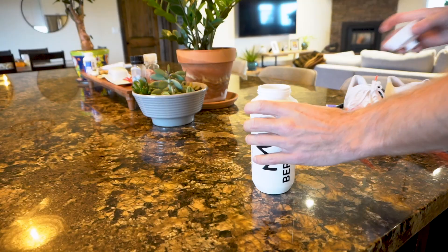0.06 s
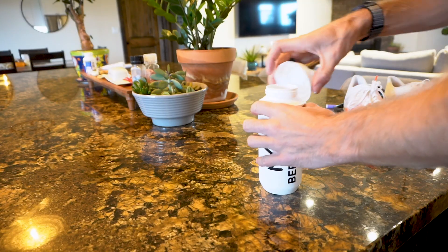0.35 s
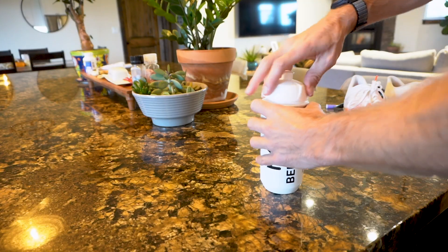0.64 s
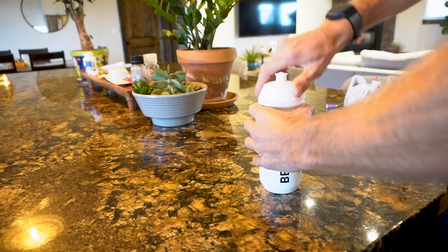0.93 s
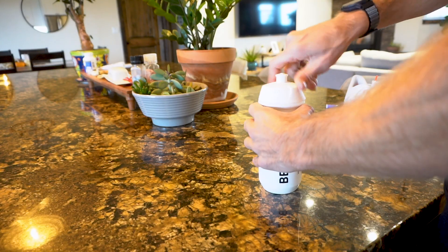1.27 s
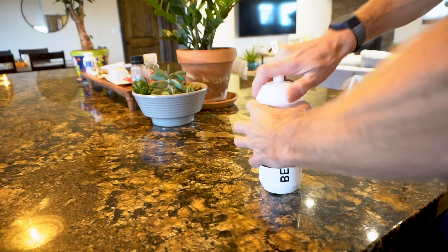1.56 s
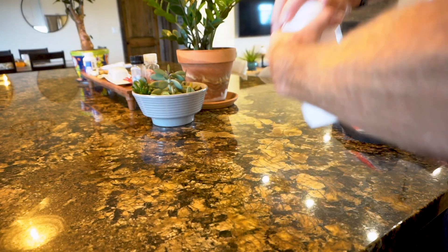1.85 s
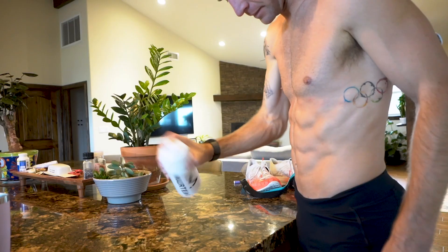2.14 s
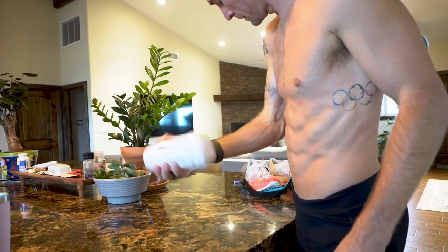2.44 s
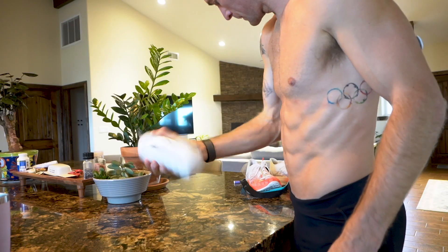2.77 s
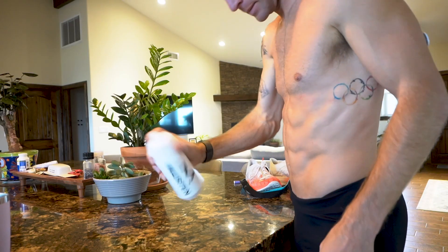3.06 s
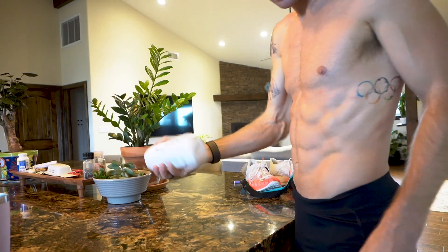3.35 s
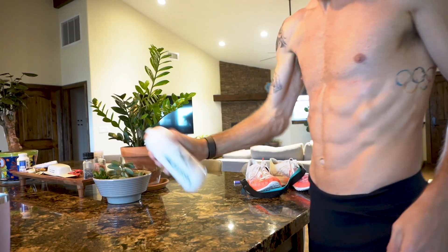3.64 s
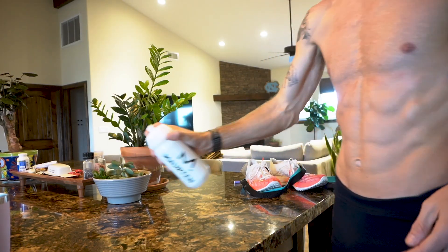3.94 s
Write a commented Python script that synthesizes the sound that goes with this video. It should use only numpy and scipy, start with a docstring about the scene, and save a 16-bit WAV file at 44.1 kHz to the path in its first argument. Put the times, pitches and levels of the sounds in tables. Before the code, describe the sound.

Plastic bottle screwed shut with snaps and squeaks, then liquid sloshes inside during hard shaking.

```python
"""A quiet kitchen, close on a plastic sports bottle on the stone counter. The lid is set on, rasps and
squeals round its thread and snaps tight; the air under it rings lower as the gap closes, and the
bottle shudders under the hand. Then comes a hard shake: the drink slams from end to end in bursts of
bubbles, thuds and spray, with wet slaps, hollow plops and a few sharp rattles on top."""
import sys
import numpy as np
from scipy import signal
from scipy.fft import rfft, irfft
from scipy.io import wavfile
from scipy.ndimage import uniform_filter1d

SR = 44100
rng = np.random.default_rng(int(sys.argv[2]) if len(sys.argv) > 2 else 0)


def wrap_up_sound(samples):
    """Save the sound to the file named by the first command line argument, as 16-bit audio."""
    columns = np.atleast_2d(samples).T
    # keep every value between -1 and 1, then stretch to whole-number steps
    tamed = np.clip(columns, -1, 1)
    steps = np.round(tamed * 32767).astype(np.int16)
    wavfile.write(sys.argv[1], SR, steps)


N = 176400
T = np.arange(N) / SR

# Tone curves, each f/Hz, relative level/dB:
AIR_EQ = [(15, -76), (25, 12.5), (53, -11.5), (82, -10.5), (123, -13), (145, -10), (161, -9.5), (217, -18),
          (624, -25), (863, -27), (936, -27), (1840, -28), (16000, -47.5)]  # still room air
RASP_EQ = [(500, -8), (2000, -6), (4500, 4), (6500, -1), (9000, -3.5), (12000, -3.5), (14000, -7),
           (16000, -7)]  # dry friction hiss
BODY_EQ = [(50, -9), (150, -4), (270, 5), (420, -6), (650, -3.5), (1100, -7.5), (2000, -9.5), (4000, -11.5),
           (9000, -44)]  # body of the rubbed bottle
TICK_EQ = [(100, 1), (600, 8.5), (2000, 2.5), (4500, -3.5), (8000, -10.5), (11000, -15), (16000, -24)]  # attack of a click or plop
SPLASH_EQ = [(200, -5), (500, -15.5), (800, -6), (1100, -2.5), (1400, -2), (1750, 2), (2050, -1.5),
             (2350, -3), (2800, -3), (3350, 0.5), (3750, -3.5), (4300, -11), (5500, -28), (9000, -15),
             (16000, -54)]  # bubbles through the wall
SPRAY_EQ = [(1000, -9), (3000, -0.5), (4600, 3), (6500, 0), (8500, -5.5), (10500, -8.5), (13000, -12),
            (16000, -17)]  # fine foam
THUD_EQ = [(40, -17), (110, -28.5), (170, -1.5), (280, -1.5), (420, -3.5), (600, -6), (1000, -18),
           (2500, -18.5), (8000, -76)]  # weight of the drink
SLAP_EQ = [(100, -20), (300, 18), (1500, -4), (3500, 0.5), (5000, 1), (8000, -6), (12000, -13.5),
           (16000, -19)]  # a drop on plastic

# Room hum: f/Hz, level/dB
HUM_TONES = [(156, -63.5)]
# Strokes of plastic and fingers: t/s, length/s, squeak/dB, level ramp/dB, squeak/Hz, hiss/dB, body/dB
RUB_STROKES = [(0, 0.072, -39.5, -8, 1720, -53.5, -39.5), (0.15, 0.15, -68, 2, 2020, -69.5, -65.5),
               (0.427, 0.13, -46, -3, 2010, -54, -44), (0.5, 0.034, -38, -14, 3420, -42, -38.5),
               (0.543, 0.1, -60, 10, 3120, -60, -50.5), (0.654, 0.062, -50, 4, 3600, -54.5, -45),
               (0.746, 0.051, -66, -3, 3500, -58, -43), (0.79, 0.03, -35.5, -3, 3450, -52, -46),
               (0.829, 0.076, -67, -9.5, 3440, -66, -42.5), (0.895, 0.073, -37.5, 1, 3580, -43, -48.5),
               (0.968, 0.059, -43.5, 5, 3640, -49, -51.5), (1.028, 0.089, -42, 3, 3660, -45, -51.5),
               (1.263, .012, -48, 3, 3500, -48, -32.5), (1.266, 0.095, -40, -5, 3600, -45, -43),
               (1.358, 0.11, -40.5, -7, 3470, -66, -46.5), (1.474, 0.035, -43.5, -3, 3440, -46, -43),
               (1.51, 0.036, -43, -3, 3380, -59, -49), (1.549, 0.059, -36.5, -4, 3280, -43, -48),
               (1.607, 0.12, -50, -4, 3400, -57.5, -47.5), (1.738, 0.028, -42, -2.5, 3330, -48.5, -51),
               (1.774, 0.02, -44, -2, 3260, -42.5, -49), (1.796, 0.14, -57.5, 1, 3440, -59, -59.5),
               (1.989, 0.046, -44.5, 0, 3260, -54, -78)]
# Plastic clicks: t/s, ring/dB, ring/Hz, ring width/Hz, knock/dB, knock/Hz, tick/dB
LID_CLICKS = [(.0085, -4, 1610, 590, -35, 600, -20), (.386, -26, 2200, 900, -34, 800, -63),
              (0.4088, 6.5, 1460, 540, -20, 520, -13.5), (0.4902, -12, 3160, 700, -15, 1320, -33),
              (0.4953, -12, 3260, 500, -17, 1190, -16.5), (.503, -30, 3400, 600, -17.5, 1020, -34),
              (0.5763, -17, 3040, 900, -14, 600, -26.5), (0.5815, -16, 3100, 450, -20, 700, -30),
              (.637, -18, 3380, 497, -17, 570, -26.5), (0.7236, -13, 3270, 450, -24, 600, -36),
              (0.7269, 3.5, 3080, 593, -1, 600, -15), (0.737, -10.5, 3560, 400, -12, 540, -33),
              (0.821, -36.5, 3400, 600, -19, 590, -36), (0.975, -34, 3600, 600, -24, 405, -36),
              (1.017, -35, 3570, 600, -18.5, 400, -41), (1.076, -35, 3600, 600, -21, 326, -38),
              (1.118, -33, 3650, 600, -21.5, 370, -36), (1.265, -9, 3360, 420, -9, 335, -29.5),
              (1.2672, 10, 3500, 423, -10, 480, -19.5), (1.499, -15, 3200, 350, -17.5, 300, -38),
              (1.5755, -1, 3040, 556, -16.5, 610, -22), (1.5754, -21, 1180, 500, -24.5, 535, -33),
              (1.688, -42, 3300, 600, -38, 560, -46), (1.7284, -30, 3330, 596, -35, 500, -39),
              (1.8258, -5, 2990, 623, -48, 600, -41), (1.919, -37, 3170, 800, -36.5, 350, -49)]
# Falling resonance of the air under the lid: t/s, f/Hz, level/dB
LID_AIR_SWEEP = [(.41, 1640, -61), (.48, 1350, -37.5), (.53, 1060, -49), (.58, 830, -47), (.66, 715, -47.5),
                 (.71, 685, -44.5), (.8, 656, -48), (.97, 596, -60.5), (1.12, 560, -52)]
# Thin squeals of the thread: t/s, length/s, level/dB, f/Hz
THREAD_SQUEALS = [(0.458, 0.033, -48, 6100), (0.492, 0.0095, -31, 7100), (0.525, 0.018, -48, 11000),
                  (.6, 0.041, -50, 10900), (1.278, 0.027, -43.5, 9000), (1.323, 0.029, -48, 10900)]
# The bottle bumps hand and counter: t/s, level/dB, f/Hz, width/Hz
BOTTLE_THUMPS = [(.582, -32.5, 86.3, 4), (.822, -21.5, 103, 18), (0.884, -34, 95, 7.7),
                 (1.026, -32, 77.5, 5.1), (1.067, -30, 88, 6.4), (1.095, -33.5, 287.6, 9.8),
                 (1.166, -36.5, 88, 7), (1.281, -18, 84, 13), (1.296, -29, 294, 10.7), (1.37, -29, 87, 6.8),
                 (1.477, -26, 260, 22), (1.477, -23, 95, 27), (1.497, -18, 102, 24),
                 (1.576, -27.5, 70.6, 8.3), (3.387, -25.5, 142, 32), (3.56, -29.5, 145, 24)]
# Wall modes that ring with each thump: f/Hz, relative level/dB, width/Hz
WALL_RESONANCES = [(234.6, -2, 3.5), (264.7, -6, 11), (298, -4.5, 8.1), (348, -11, 9.2)]
# The drink hits the wall: t/s, hold/s, splash/dB, thud/dB, spray/dB
SLOSH_HITS = [(2.027, 0.033, -24, -42.5, -39), (2.088, 0.01, -29, -33, -40),
              (2.126, 0.015, -32.5, -32.5, -39.5), (2.208, 0.021, -24, -32, -39.5),
              (2.241, 0.011, -26.5, -52, -37), (2.279, 0.013, -32, -42, -55),
              (2.319, 0.018, -29.5, -33.5, -37.5), (2.404, 0.025, -24, -30.5, -40),
              (2.486, 0.012, -52, -34.5, -53), (2.51, 0.0066, -41, -47, -48),
              (2.606, 0.031, -22.5, -36, -38), (2.661, 0.031, -31.5, -38, -49),
              (2.767, 0.012, -45, -34.5, -52), (2.8, 0.028, -25, -31, -36.5),
              (2.848, 0.073, -26, -35.5, -39.5), (2.927, 0.048, -32, -51, -54),
              (2.976, 0.025, -26.5, -44, -40), (2.999, 0.015, -25, -33, -37.5),
              (3.086, 0.013, -32, -33, -40.5), (3.152, 0.0069, -27, -33, -43),
              (3.196, 0.045, -29.5, -36, -43), (3.376, 0.0039, -29, -28, -35),
              (3.397, 0.045, -25.5, -40.5, -41), (3.465, 0.0069, -25, -27, -42),
              (3.505, 0.024, -25, -33.5, -40), (3.541, 0.026, -28, -37.5, -37.5),
              (3.588, 0.032, -27, -48, -38.5), (3.635, .008, -24.5, -34.5, -44),
              (3.682, 0.051, -23, -34.5, -38.5), (3.756, 0.047, -29, -36.5, -44.5),
              (3.836, 0.0071, -27, -38, -58), (3.869, 0.0092, -25.5, -35, -40),
              (3.918, 0.012, -27, -43, -45), (3.962, .012, -32, -45, -39.5)]
# Drops slap the wall: t/s, level/dB
DROP_SLAPS = [(2.034, -42), (2.052, -18), (2.143, -25), (2.255, -18), (2.439, -19), (2.531, -23),
              (2.615, -14.5), (2.806, -20), (2.89, -24), (2.993, -23), (3.241, -28), (3.35, -29),
              (3.4, -38), (3.423, -31), (3.447, -18.5), (3.644, -31), (3.733, -19), (3.802, -19.5)]
# Slugs of drink knock the wall: t/s, level/dB, f/Hz
SLUG_KNOCKS = [(2.046, -17.5, 364), (2.212, -12.5, 385), (2.432, -9.5, 280), (2.61, -15.5, 355),
               (2.813, -16.5, 362), (2.999, -9.5, 454), (3.518, -22, 418)]
# Single plops and rattles: t/s, level/dB, f/Hz, width/Hz
PLOP_HITS = [(2.0915, -7, 1970, 130), (2.698, -9.5, 1890, 130), (2.785, -19, 1800, 21),
             (2.806, -21, 1755, 25), (2.911, -10, 2000, 105), (2.952, -6, 1740, 160),
             (3.131, -22, 1800, 38), (3.162, -20, 1760, 60), (3.203, -15, 2590, 73), (3.329, -9, 1776, 71),
             (3.348, -8.5, 3580, 196), (3.377, -26, 1650, 67), (3.402, -11, 2010, 140),
             (3.421, -11.5, 1140, 150), (3.709, -15, 1150, 150), (3.433, -16.5, 3270, 70),
             (3.594, -18, 2070, 45), (3.8609, -2.5, 3020, 300), (3.894, 1, 3400, 200)]
# Spits of fine foam: t/s, level/dB
FOAM_SPITS = [(2.139, -34), (3.315, -28), (3.386, -24), (3.949, -27)]
# Reverb time of the kitchen: f/Hz, T60/s
KITCHEN_DECAY = [(100, 0.54), (500, 0.61), (1600, 0.3), (3500, 0.63), (8000, 0.35), (16000, 0.21)]


def amp(db):
    """Decibels to gain."""
    return 10 ** (np.asarray(db) / 20)


def unit(x):
    """Scales to rms 1."""
    return x / np.sqrt(np.mean(x ** 2) + 1e-20)


def read(points, hz):
    """Reads a table along a log-frequency axis."""
    f, value = np.transpose(points)
    return np.interp(np.log(hz + 1), np.log(f + 1), value)


def add(mix, s, sound):
    """Drops a sound into the mix at s seconds."""
    part = mix[max(round(s * SR), 0):][:len(sound)]
    part += sound[:len(part)]


def colour(x, curve, size=4096):
    """Minimum-phase EQ with the given tone curve and unit energy."""
    log_gain = np.log(amp(read(curve, abs(np.fft.fftfreq(size, 1 / SR)))))
    taps = np.fft.ifft(np.exp(np.conj(signal.hilbert(log_gain)))).real[:size // 2]
    return signal.fftconvolve(x, taps / np.linalg.norm(taps))[:len(x)]


def ring(hz, width_hz, rise_s):
    """One damped mode with a soft attack."""
    t = T[:SR // 2]
    return (1 - np.exp(-t / rise_s)) * np.exp(-np.pi * width_hz * t) * np.sin(2 * np.pi * hz * t)


def burst(decay_s):
    """A noise transient with an instant attack."""
    t = T[:SR // 40]
    return np.exp(-t / decay_s) * rng.standard_normal(len(t))


def crackle(per_s, spread_db):
    """Random impulses of uneven size."""
    size = amp(spread_db * np.minimum(rng.exponential(1, N), 4))
    return size * rng.choice([-1., 1.], N) * (rng.random(N) < per_s / SR)


def flutter(depth_db, smooth_s):
    """A gain that wanders at random."""
    return amp(depth_db * unit(uniform_filter1d(rng.standard_normal(N), round(smooth_s * SR))))


def room_tone(air_db=-52.5):
    """A bed of faint air noise and low hum."""
    hum = sum(amp(db) * np.sqrt(2) * np.sin(2 * np.pi * (hz * T + rng.random())) for hz, db in HUM_TONES)
    return amp(air_db) * unit(colour(rng.standard_normal(N), AIR_EQ)) + hum


def shifting_grip(rasp, bands=9):
    """The grip shifts, so each treble band of the rasp swells and sinks on its own."""
    centres_hz = np.linspace(2000, 16000, bands)
    position = np.interp(np.fft.rfftfreq(N, 1 / SR), centres_hz, np.arange(bands))
    spectrum, out = rfft(rasp), np.zeros(N)
    for k in range(bands):
        band = irfft(spectrum * np.maximum(1 - abs(position - k), 0), N)
        out += flutter(depth_db=2.5, smooth_s=0.018) * band
    return unit(out)


def rubbing(slips_per_s=4200, spread_db=2.5, stage_width_hz=900, edge_s=0.0034):
    """Dense tiny slips excite a squeaky lid resonance, a dry hiss and the bottle's body."""
    slips = crackle(slips_per_s, spread_db)
    hiss = shifting_grip(colour(slips, RASP_EQ))
    body = unit(colour(crackle(slips_per_s, spread_db), BODY_EQ))
    out = np.zeros(N)
    for s, length, squeak_db, ramp_db, hz, hiss_db, body_db in RUB_STROKES:
        b, a = signal.iirpeak(hz, hz / stage_width_hz, SR)
        squeak = unit(signal.lfilter(b, a, signal.lfilter(b, a, slips)))
        gate = np.clip(np.minimum(T - s, s + length - T) / edge_s + .5, 0, 1)
        ramp = amp(ramp_db * np.clip((T - s) / length, 0, 1))
        out += gate * ramp * (amp(squeak_db) * squeak + amp(hiss_db) * hiss + amp(body_db) * body)
    return out


def lid_clicks(rise_s=0.00025, knock_width_hz=220):
    """Each click opens with a bright tick, rings the lid and knocks the bottle wall."""
    out, ticks = np.zeros((2, N))
    for s, ring_db, hz, width_hz, knock_db, knock_hz, tick_db in LID_CLICKS:
        add(out, s, amp(ring_db) * ring(hz, width_hz, rise_s))
        add(out, s, amp(knock_db) * ring(knock_hz, knock_width_hz, rise_s))
        add(ticks, s, amp(tick_db) * burst(decay_s=.002))
    return out + colour(ticks, TICK_EQ)


def lid_air(stage_width_hz=340):
    """The air under the lid resonates lower as the gap closes."""
    s, hz, db = np.transpose(LID_AIR_SWEEP)
    carrier = np.exp(2j * np.pi * np.cumsum(np.interp(T, s, hz)) / SR)
    pole = np.exp(-np.pi * stage_width_hz / SR)
    # Shift down, low-pass in two stages, shift back: a noise band that rides the sweep.
    air = carrier * signal.lfilter([1], [1, -2 * pole, pole * pole], rng.standard_normal(N) / carrier)
    return unit(air.real) * amp(np.interp(T, s, db)) * (T > s[0]) * (T < s[-1])


def thread_squeals(q=7):
    """The thread catches and sings briefly at a high pitch."""
    out = np.zeros(N)
    for s, length, db, hz in THREAD_SQUEALS:
        b, a = signal.iirpeak(hz, q, SR)
        swell = np.sin(np.pi * np.clip((T - s) / length, 0, 1))
        out += amp(db) * swell * unit(signal.lfilter(b, a, rng.standard_normal(N)))
    return out


def bottle_thumps(rise_s=0.0027, wall_db=-17.5):
    """The pressed bottle wobbles at a low pitch and its wall rings along."""
    out = np.zeros(N)
    wall = amp(wall_db) * sum(amp(db) * ring(hz, width, rise_s) for hz, db, width in WALL_RESONANCES)
    for s, db, hz, width_hz in BOTTLE_THUMPS:
        add(out, s, amp(db) * (ring(hz, width_hz, rise_s) + wall))
    return out


def bubbles(envelope, pitches_hz, curve, per_s, decay_cycles, glide=0.056):
    """A swarm of short, slightly rising bubble tones, heard through the bottle wall."""
    swarm, t = np.zeros((2, N)), T[:SR // 25]
    for hz in pitches_hz:
        age = t * hz / decay_cycles
        rising_hz = hz * (1 + glide * np.minimum(age, 2))
        tone = np.exp(-age) * np.sin(2 * np.pi * np.cumsum(rising_hz) / SR)
        births = crackle(per_s / len(pitches_hz), spread_db=3)
        swarm += hz * signal.oaconvolve(np.array([births, births * envelope]), tone[None], axes=1)[:, :N]
    steady, surging = swarm  # the steady swarm only sets the gain
    return colour(surging, curve) / np.std(colour(steady, curve))


def sloshing(start_s=2.034, rise_s=0.0043, fall_s=0.017):
    """Every hit of the drink throws up bubbles, a low thud and fine foam above the steady churn."""
    power = amp([[-30.5], [-42.5], [-44.5]]) ** 2  # churn between hits: splash, thud, spray
    for s, hold, splash_db, thud_db, spray_db in SLOSH_HITS:
        surge = np.clip((T - s) / rise_s, 0, 1) * np.exp(-np.maximum(T - s - hold, 0) / fall_s)
        power = power + (amp([[splash_db], [thud_db], [spray_db]]) * surge) ** 2
    splash, thud, spray = np.sqrt(power) * (T > start_s)
    clumps = unit(flutter(depth_db=2.5, smooth_s=0.0049))
    large_hz, fine_hz = np.geomspace(500, 6000, 48), np.geomspace(3000, 15000, 32)
    return (bubbles(splash, large_hz, SPLASH_EQ, per_s=6000, decay_cycles=5.2)
            + bubbles(spray * clumps, fine_hz, SPRAY_EQ, per_s=10000, decay_cycles=6.3)
            + colour(thud * unit(crackle(per_s=1400, spread_db=3)), THUD_EQ))


def drop_slaps():
    """Larger drops strike the wall with a short wet tick."""
    out = np.zeros(N)
    for s, db in DROP_SLAPS:
        add(out, s, amp(db) * burst(decay_s=0.001))
    return colour(out, SLAP_EQ)


def slug_knocks():
    """Slugs of drink land on the wall with a dull, damped knock."""
    out = np.zeros(N)
    for s, db, hz in SLUG_KNOCKS:
        add(out, s, amp(db) * ring(hz, width_hz=110, rise_s=0.0013))
    return out


def plops(tick_db=-18.5):
    """Large bubbles and rattles ring out of the churn, each with a little tick on the wall."""
    out = np.zeros(N)
    for s, db, hz, width_hz in PLOP_HITS:
        add(out, s, amp(db) * ring(hz, width_hz, rise_s=0.00042))
        add(out, s, amp(db + tick_db) * colour(burst(decay_s=.002), TICK_EQ))
    return out


def foam_spits(low_cut_hz=7000):
    """Foam bursts with a thin, very high tick."""
    out = np.zeros(N)
    for s, db in FOAM_SPITS:
        add(out, s, amp(db) * burst(decay_s=0.001))
    return signal.sosfilt(signal.butter(2, low_cut_hz, "high", fs=SR, output="sos"), out)


def kitchen(x, early_db=-16, early_decay_s=0.0075, tail_db=-19):
    """Quick reflections from counter and hands, then a weak room tail."""
    t = T[:SR]
    hz, frame_s, spectra = signal.stft(rng.standard_normal(SR) * (t > .008), SR, nperseg=256)
    decay = amp(-60 * frame_s / read(KITCHEN_DECAY, hz)[:, None])
    tail = signal.istft(spectra * decay, SR, nperseg=256)[1][:SR]
    early = rng.standard_normal(SR) * (rng.random(SR) < .1) * (t > .002) * np.exp(-t / early_decay_s)
    echo = amp(tail_db) * tail / np.linalg.norm(tail) + amp(early_db) * early / np.linalg.norm(early)
    return x + signal.fftconvolve(x, echo)[:N]


def scene():
    """The bottle is closed, then shaken, over a bed of room tone."""
    closing = lid_clicks() + bottle_thumps() + rubbing() + thread_squeals() + lid_air()
    shaking = sloshing() + slug_knocks() + plops() + drop_slaps() + foam_spits()
    return (kitchen(closing + shaking) + room_tone())[None]


def record(dry, low_cut_hz=58, high_cut_hz=16200):
    """The microphone sheds deep bass and clips on the loudest snap; a steep filter trims the top."""
    thinned = signal.sosfilt(signal.butter(2, low_cut_hz, "high", fs=SR, output="sos"), dry)
    high_cut = signal.firwin(511, high_cut_hz, window=("kaiser", 9), fs=SR)
    return signal.oaconvolve(np.clip(thinned, -1, 1), high_cut[None], "same")


dry = scene()
out = record(dry)
wrap_up_sound(out)
```